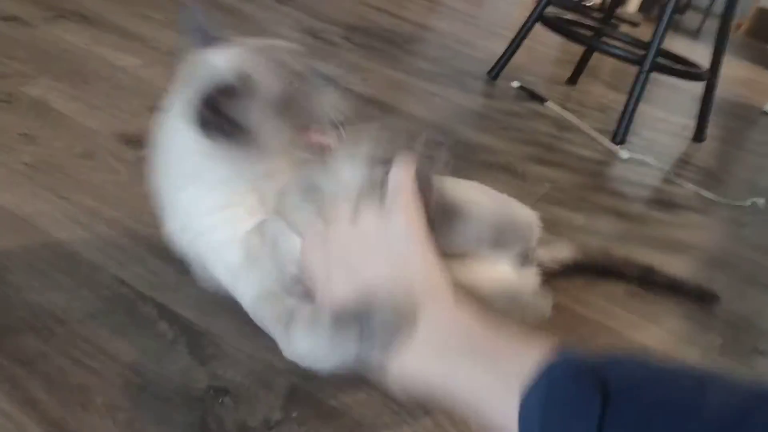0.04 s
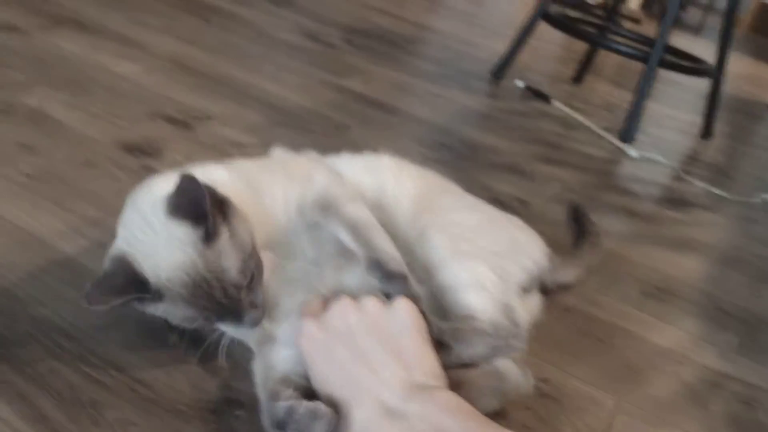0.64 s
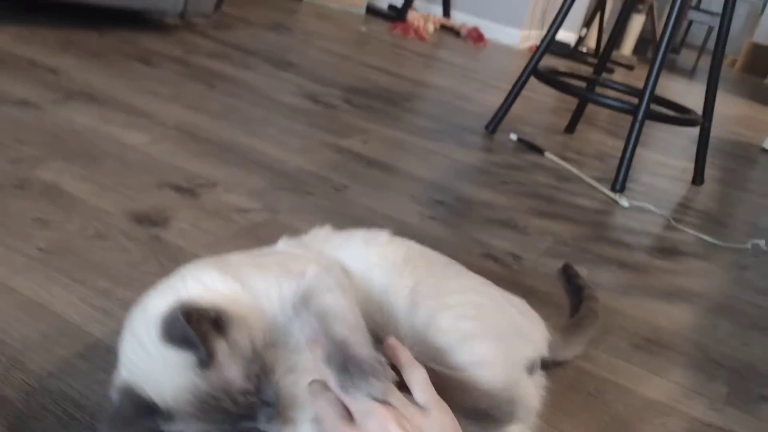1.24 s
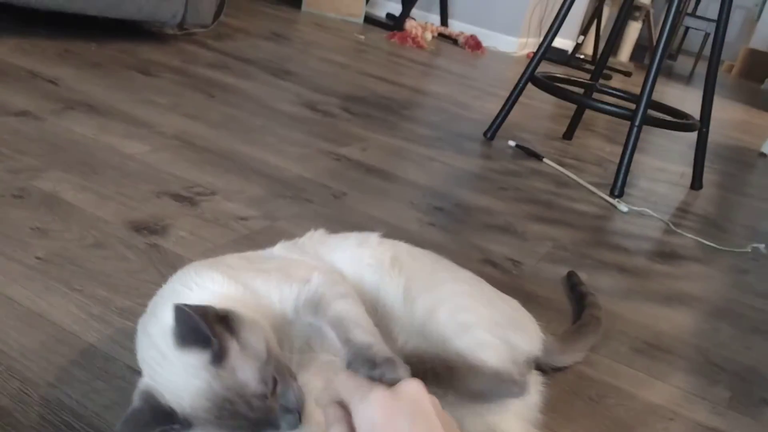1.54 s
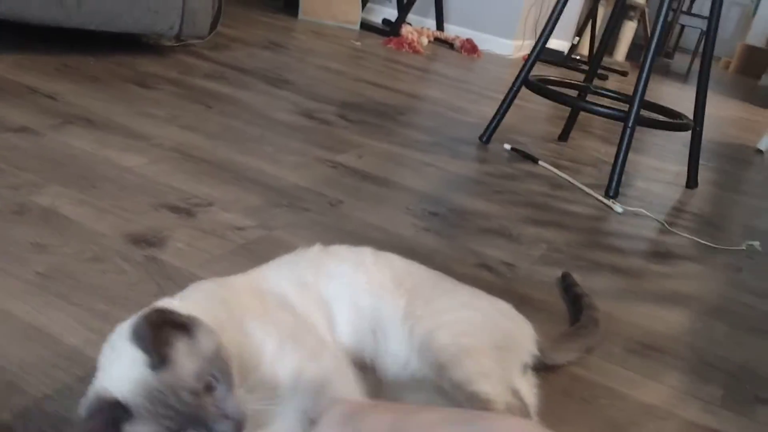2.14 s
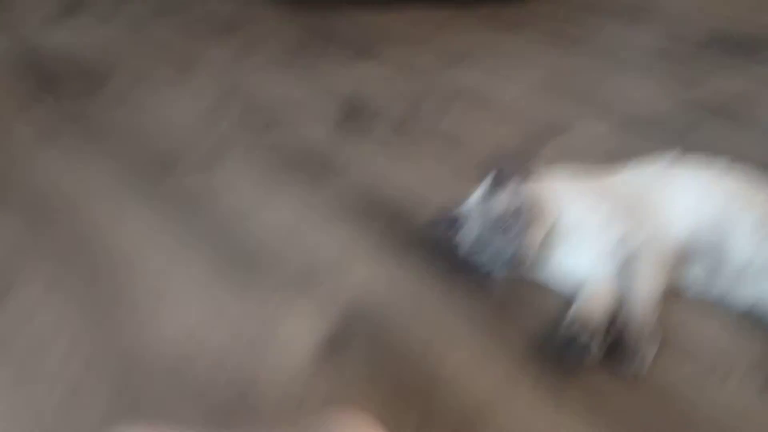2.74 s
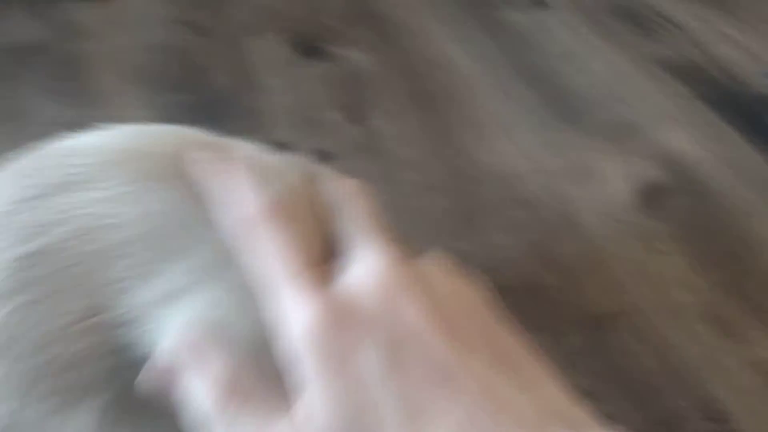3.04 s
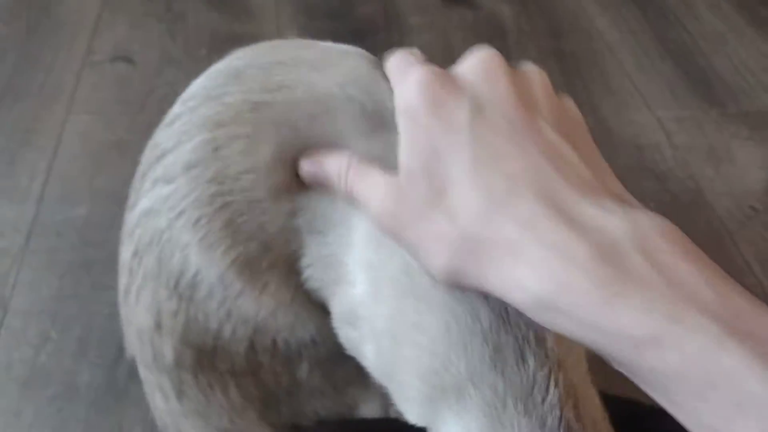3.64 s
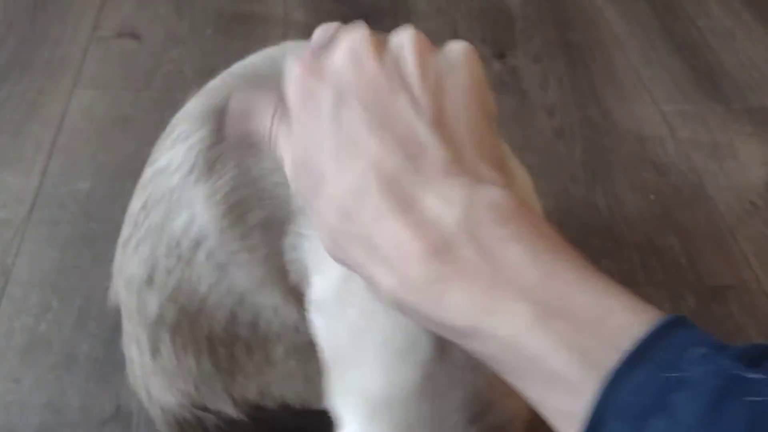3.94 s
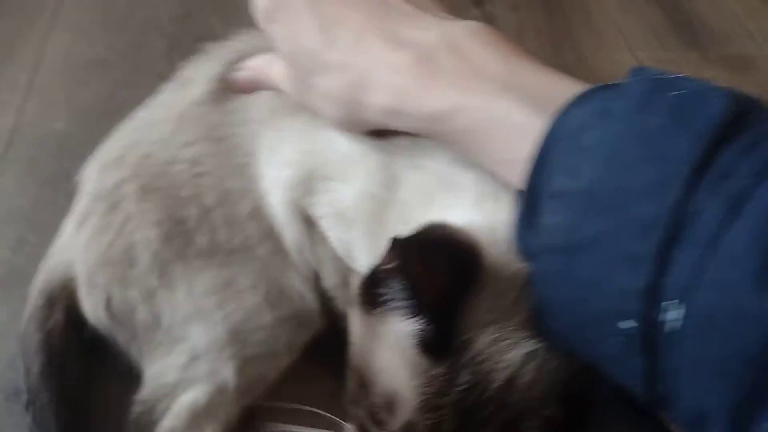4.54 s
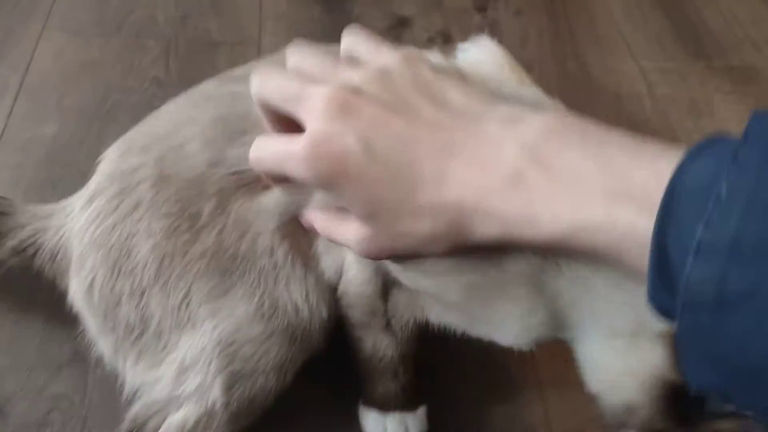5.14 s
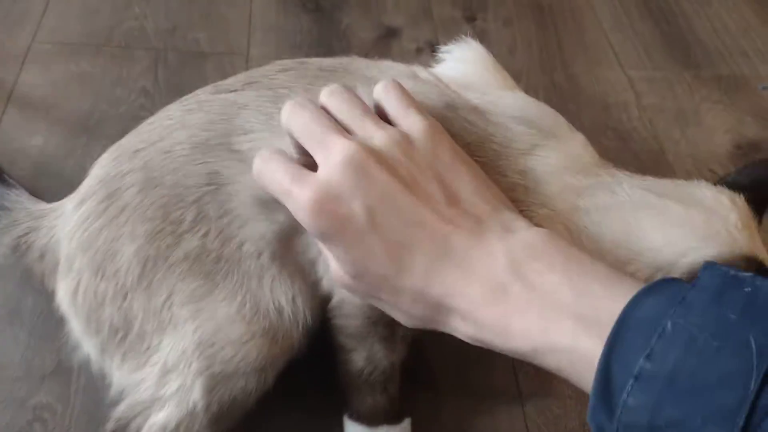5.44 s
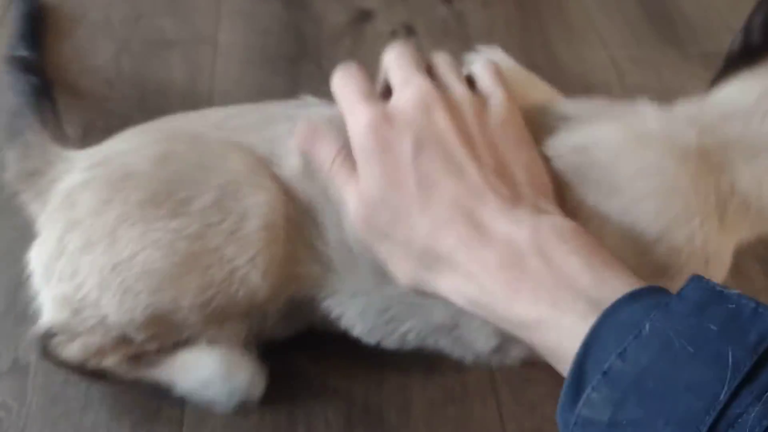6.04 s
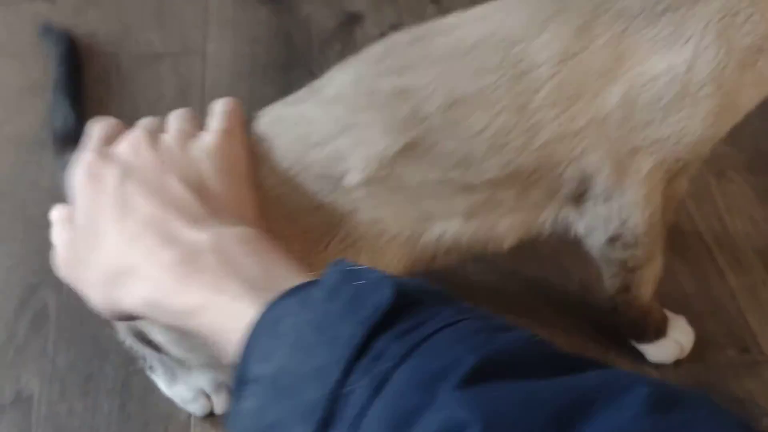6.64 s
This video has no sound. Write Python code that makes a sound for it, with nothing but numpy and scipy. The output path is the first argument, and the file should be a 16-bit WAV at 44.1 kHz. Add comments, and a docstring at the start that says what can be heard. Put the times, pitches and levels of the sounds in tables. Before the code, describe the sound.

A hand rubs a cat's fur close to the microphone in a quiet room. For the first second there is only faint brushing and a few light taps. From about 1.2 seconds the strokes grow into short, scratchy swishes, unevenly spaced and sometimes slightly hollow, each dying away quickly. A small, distinct knock of paw or hand comes at about 2 seconds. From 2.7 to 4.7 seconds the rubbing is briskest, and a jacket sleeve adds sharp snaps and short rasping scuffs, loudest around 3.6 seconds. After a brief lull, one more strong stroke with cloth snaps comes at 5.2 seconds. It then goes quiet, with softer strokes around 6 seconds, a faint slow rub, and a couple of soft bumps near 6.7 seconds. A faint low handling rumble and an appliance hum run underneath throughout.

```python
"""Brisk rub through a cat's fur

A hand rubs a cat on a wooden floor, the jacket sleeve close by. Countless hairs and threads slip,
so each stroke is a scratchy swish that dies away, with a hollow tone from the air under the palm.
The cloth catches and lets go in sharp snaps and short scuffs. Paws and hand bump softly,
over a low handling rumble and the hum of an appliance in the quiet room."""
import sys
import numpy as np
from scipy import signal
from scipy.fft import irfft
from scipy.io import wavfile

SR = 44100
rng = np.random.default_rng(int(sys.argv[2]) if len(sys.argv) > 2 else 0)


def dump(signal):
    """Clip the signal to [-1, 1] and save it as 16-bit WAV at the path in sys.argv[1]."""
    limited = np.clip(np.atleast_2d(signal).T, -1, 1)
    pcm = np.round(limited * 32767).astype(np.int16)
    wavfile.write(sys.argv[1], SR, pcm)


N = 304290
TIME = np.arange(N) / SR
CUTOFF_HZ = 8350
# a stroke sags while the hand travels, then dies away; the ruffled hairs keep settling quietly
SAG_DB_PER_S, TREBLE_RELEASE_DB_PER_S, BODY_RELEASE_DB_PER_S = 38, 146, 136
SETTLE_DB, SETTLE_DB_PER_S = -22.5, 35.5

# strokes of the hand, with body, hiss and hollow levels relative to the scratch:
# start_s, attack_s, hold_s, scratch_db, body_db, hiss_db, hollow_hz, hollow_db
HAND_STROKES = [ (0.107, 0.026, 0.095, -79, 9.5, 3, 1300, -6),
                (0.797, 0.022, 0.077, -71, -1.5, -5.5, 1310, -12),
                (0.886, 0.014, 0.12, -63.5, -3, -7, 1090, -14),
                (1.247, 0.0099, 0.053, -47.5, -8, -10, 1580, -4.5),
                (1.378, 0.065, 0.043, -43, -10.5, -6.5, 976, -12.5),
                (1.703, 0.0032, 0.084, -37, -8, -4, 917, -17),
                (1.925, .02, 0.066, -40.5, -5, -8.5, 850, -12),
                (2.244, .004, 0.04, -46, -5.5, -1.5, 815, -16),
                (2.436, 0.078, 0.08, -37.5, -7, -5, 1230, -11),
                (2.672, 0.0086, 0.056, -47.5, -3, -4, 715, -22.5),
                (2.73, 0.0049, 0.052, -36, -23, 2.5, 644, -5),
                (2.829, 0.038, 0.095, -43.5, -3, -2.5, 608, -17),
                (3.173, 0.0089, 0.083, -36, -10.5, 1, 726, -9.5),
                (3.323, 0.0087, .085, -35, -6.5, -0.5, 1135, -11.5),
                (3.558, 0.006, 0.051, -31, -10.5, 0.5, 760, -16),
                (3.677, 0.0084, 0.039, -34, -7.5, -2, 1280, -13.5),
                (3.961, 0.0064, 0.088, -36.5, -4.5, 1, 840, -22),
                (4.116, 0.045, 0.021, -43, -16, -0.5, 1400, -18),
                (4.264, 0.079, 0.048, -41.5, -3.5, -8, 1280, -19),
                (4.519, 0.018, 0.033, -40, -10, -8.5, 1004, -18.5),
                (4.624, 0.0068, 0.056, -37.5, -3, -6, 996, -2),
                (4.871, 0.0067, 0.032, -54, -5, -5, 1120, -8),
                (4.977, 0.045, .02, -53.5, -5.5, -14, 1400, -22),
                (5.221, 0.01, 0.092, -35, -5, -1, 1147, -5.5),
                (5.976, 0.014, .01, -60.5, 1.5, -13, 1250, 0.5),
                (6.049, 0.051, 0.036, -52.5, -10, -9.5, 1250, -28),
                (6.287, 0.22, 0.17, -65, -4, -12, 1100, -11)]
# muffled rub of the palm pressing into the coat: time_s, level_db
PALM_PRESS = [(0.0, -79.5), (0.6, -83), (1.2, -76.5), (1.7, -66), (2.2, -66.5), (2.75, -55.5),
              (3.04, -57.5), (3.16, -61), (3.42, -55), (4.05, -59.5), (4.24, -69.5), (4.62, -55.5),
              (4.85, -69.5), (5.25, -70), (5.5, -74), (6.25, -75.5), (6.5, -67.5), (6.9, -79.5)]
# modes of the air pocket under the palm: pitch_ratio, level_db
PALM_MODES = [(1, -0.5), (1.93, -7.5), (2.7, -3)]
# cloth snapping free: start_s, level_db, ring_hz
CLOTH_SNAPS = [(2.2469, -26, 3770), (2.4734, -26.5, 3970), (2.668, -28.5, 4330), (2.7303, -15, 3650),
               (2.7356, -13.5, 3900), (3.1759, -13, 3470), (3.469, -28.5, 3800), (3.519, -22.5, 4310),
               (3.5627, -8, 4660), (3.5676, -10, 4200), (3.68, -22.5, 3880), (3.9647, -13.5, 4900),
               (3.9845, -17.5, 4900), (4.2645, -29, 3680), (4.2724, -20.5, 3780), (4.5246, -30.5, 3410),
               (4.5403, -37, 3500), (4.6246, -19, 3530), (4.6448, -12.5, 3800), (4.6627, -17, 3830),
               (4.8825, -34, 3360), (5.2216, -19.5, 4830), (5.2347, -10, 4390), (6.0553, -35, 3800)]
# folds of cloth dragging: middle_s, level_db, half_length_s
CLOTH_SCUFFS = [(1.242, -58, .0018), (1.704, -38, 0.00083), (1.942, -38, 0.0021), (2.74, -24, 0.0013),
                (2.762, -38, 0.0035), (2.909, -33.5, .0048), (3.191, -25.5, 0.0023), (3.337, -23.5, 0.0035),
                (3.342, -18, 0.0033), (3.574, -20, .0015), (3.594, -30.5, .0007), (3.713, -20.5, 0.0055),
                (4.012, -27.5, .0043), (4.312, -27.5, 0.0079), (4.345, -24.5, 0.0037),
                (4.634, -31.5, 0.0032), (4.651, -22, 0.00097), (4.684, -41, .0025), (5.025, -42, 0.0046),
                (5.046, -39, 0.0035), (5.225, -28, 0.0015), (5.241, -21.5, 0.0024), (6.003, -48, 0.0051),
                (6.086, -40, 0.0043)]
# taps and bumps of paws and hand: start_s, peak_db, low_hz, high_hz, decay_s
SOFT_BUMPS = [(0.113, -54.5, 150, 980, 0.0088), (0.259, -52, 794, 2130, .003),
              (0.558, -57, 400, 1930, 0.0014), (0.676, -45, 225, 740, 0.0036),
              (0.789, -54.5, 1200, 4200, 0.0016), (1.44, -44.5, 130, 1000, .008),
              (1.9, -36.5, 820, 1250, 0.014), (2.03, -23, 706, 1240, 0.0027),
              (2.09, -39, 700, 1390, 0.0015), (2.295, -42, 686, 1000, 0.0023),
              (2.575, -34, 280, 700, 0.0024), (2.648, -39, 200, 1000, 0.0098),
              (3.028, -33.5, 1500, 3530, 0.0049), (3.717, -37.5, 220, 707, 0.0058),
              (4.049, -42.5, 250, 605, 0.0077), (5.90, -48.5, 700, 1386, 0.0021),
              (6.34, -49, 498, 1175, 0.0037), (6.637, -47, 151, 600, .002),
              (6.661, -37.5, 300, 1410, 0.002), (6.661, -40, 110, 398, 0.0018)]
# partials of the appliance hum: pitch_hz, relative_db
HUM_PARTIALS = [(64.6, -11), (129.2, -1)]
# swell and ebb of the hum: time_s, level_db
HUM_FADER = [(0, -72), (.6, -79.5), (1.5, -66), (2.3, -73.5), (2.9, -63), (3.15, -66), (4.55, -62.5),
             (5.0, -68.5), (5.3, -63.5), (5.7, -65), (5.87, -74.5), (6.2, -59.5), (6.9, -79)]

# tone colour of each layer: frequency_hz, gain_db
SCRATCH_EQ = [(1500, -36.5), (2300, -9.5), (2900, -3), (3500, 2.5), (4200, 2), (4800, -0.5), (5600, -14),
              (7500, -29)]  # bright scratch of the fur
HISS_EQ = [(3200, -20), (4400, -2.5), (5400, 7.5), (6400, 5), (7500, 3), (8300, -22), (9000, -22)]  # sheen of the finest hairs
BODY_EQ = [(450, -31.5), (700, -8.5), (950, -2.5), (1250, 0.5), (1650, -2), (2250, -1.5), (2600, -4.5),
           (3200, -4), (5000, -37)]  # midrange of the swish
RUB_EQ = [(120, -27.5), (230, -10.5), (340, -1), (450, -0.5), (600, -3), (800, -8.5), (1500, -38)]  # muffled rub of the palm
SNAP_EQ = [(200, -39), (500, -32), (800, -15.5), (1250, -10.5), (1900, -8), (2700, -5), (3600, -2),
           (4500, 1.5), (5500, -6), (7000, -9), (8500, -32.5)]  # crack of taut cloth
SCUFF_EQ = [(300, -29.5), (700, -27), (1200, -9), (1800, -12.5), (2400, -5.5), (3100, -3), (3900, 2.5),
            (4600, -2.5), (5500, -5), (7000, -19), (8500, -47.5)]  # rasp of a dragging fold
RUMBLE_EQ = [(20, -25.5), (45, -13.5), (65, -8.5), (82, -6), (98, 4.5), (115, -2.5), (140, -3.5), (190, -4),
             (270, -11.5), (500, -38.5)]  # low end of the handling


def fur_swish():
    """Countless hairs and threads slip; the grip flutters, moving all their colours together."""
    press_db = automation(PALM_PRESS)
    scratch_gain, body_gain, hiss_gain = stroke_gains(press_db)
    grip_db = 0.37 * drift(per_s=96)
    scratch = scratch_gain * unit_rms(eq(slips(per_s=14000, spread_db=3.5), SCRATCH_EQ))
    hiss = hiss_gain * unit_rms(eq(slips(per_s=21000, spread_db=1.0), HISS_EQ))
    body = body_gain * unit_rms(eq(slips(per_s=5200, spread_db=3.5), BODY_EQ))
    rub = from_db(press_db) * unit_rms(eq(slips(per_s=1200, spread_db=3.0), RUB_EQ))
    rustle = from_db(grip_db) * (scratch + hiss + body + rub)
    rustle = near_echo(rustle, delay_s=0.0013, share=0.19)
    return near_echo(rustle, delay_s=0.0034, share=0.25)


def stroke_gains(press_db, rest_db=(-3, 1.5, -4)):
    """Gains of scratch, body and hiss: the strokes add their power to the resting hand's rustle."""
    scratch, body, hiss = (from_db(press_db + db) ** 2 for db in rest_db)
    for start_s, attack_s, hold_s, scratch_db, body_db, hiss_db, _, _ in HAND_STROKES:
        treble_shape = stroke_envelope(attack_s, hold_s, TREBLE_RELEASE_DB_PER_S)
        body_shape = stroke_envelope(attack_s, hold_s, BODY_RELEASE_DB_PER_S)
        mix_in(scratch, start_s, (from_db(scratch_db) * treble_shape) ** 2)
        mix_in(hiss, start_s, (from_db(scratch_db + hiss_db) * treble_shape) ** 2)
        mix_in(body, start_s, (from_db(scratch_db + body_db) * body_shape) ** 2)
    return np.sqrt([scratch, body, hiss])


def stroke_envelope(attack_s, hold_s, release_db_per_s):
    """One second of gain: the stroke rises, sags and dies away while the hairs settle."""
    age = TIME[:SR]
    sag_db = SAG_DB_PER_S * np.clip(age - attack_s, 0, hold_s)
    release_db = release_db_per_s * np.maximum(age - attack_s - hold_s, 0)
    settling_db = SETTLE_DB - SETTLE_DB_PER_S * age
    return np.minimum(age / attack_s, 1) * from_db(np.maximum(-sag_db - release_db, settling_db))


def cupped_palm(width_hz=230):
    """Friction sounds the air pocket under the palm, whose size differs from stroke to stroke."""
    out = np.zeros(N)
    friction = slips(per_s=7400, spread_db=3.0)
    for start_s, attack_s, hold_s, scratch_db, _, _, hollow_hz, hollow_db in HAND_STROKES:
        drive = np.roll(friction, -int(start_s * SR))[:SR]
        hollow = np.zeros(SR)
        for ratio, mode_db in PALM_MODES:
            hz = ratio * hollow_hz
            hollow += from_db(mode_db) * resonate(resonate(drive, hz, width_hz), hz, width_hz)
        shape = stroke_envelope(attack_s, hold_s, BODY_RELEASE_DB_PER_S)
        mix_in(out, start_s, from_db(scratch_db + hollow_db) * unit_rms(hollow) * shape)
    return out


def cloth_snaps(sweep_s=0.0018, rebound_db=-2.0, shiver_db=-19.5, shiver_s=0.002):
    """Taut cloth lets go, rebounds about a millisecond later and shivers; its treble travels fastest."""
    clicks, age = np.zeros(N), TIME[:900]
    for start_s, level_db, ring_hz in CLOTH_SNAPS:
        snap = from_db(shiver_db) * rng.standard_normal(len(age)) * np.exp(-age / shiver_s)
        snap[0] = 1  # the cloth lets go
        rebound_s = rng.uniform(0.0007, 0.0014)
        snap[int(rebound_s * SR)] += from_db(rebound_db) * rng.choice([-1, 1])
        # every fold has its own size, and so its own brief ring
        ring = 0.96 * resonate(snap, ring_hz, width_hz=600)
        mix_in(clicks, start_s + sweep_s / 2, from_db(level_db) * (snap + ring))
    return eq(clicks, SNAP_EQ, sweep_s)


def cloth_scuffs():
    """A fold drags for a few milliseconds: a swelling train of slips in the same cloth."""
    drag = np.zeros(N)
    for middle_s, level_db, half_length_s in CLOTH_SCUFFS:
        offset = (TIME - middle_s) / half_length_s
        drag += from_db(level_db) * np.exp(-0.5 * np.minimum(offset ** 2, 100))
    return drag * unit_rms(eq(slips(per_s=6000, spread_db=0), SCUFF_EQ, sweep_s=0.0019))


def soft_bumps():
    """Paws and hand land with a short push, duller the softer the pad."""
    out, age = np.zeros(N), TIME[:3000]
    for start_s, peak_db, low_hz, high_hz, decay_s in SOFT_BUMPS:
        push = rng.standard_normal(len(age)) * np.exp(-age / decay_s)
        pad = signal.butter(2, [low_hz, high_hz], "band", fs=SR, output="sos")
        thud = signal.sosfilt(pad, push)
        mix_in(out, start_s, from_db(peak_db) * thud / np.abs(thud).max())
    return out


def handling_rumble(base_db=-66.5, base_press_db=-70, follow=0.42):
    """Low rumble that grows as the palm presses harder."""
    level_db = base_db + follow * (automation(PALM_PRESS) - base_press_db)
    return from_db(level_db) * unit_rms(eq(rng.standard_normal(N), RUMBLE_EQ))


def appliance_hum(waver_rad=0.39):
    """An appliance drones on two low partials, each wavering in phase."""
    hum = np.zeros(N)
    for hz, db in HUM_PARTIALS:
        phase = 2 * np.pi * hz * TIME + waver_rad * drift(per_s=1.2)
        hum += from_db(db) * np.sqrt(2) * np.sin(phase)
    return from_db(automation(HUM_FADER)) * hum


def near_echo(x, delay_s, share):
    """A reflection from a surface close by; its path wanders as the arm moves, so the colour shifts."""
    lag_s = delay_s * np.exp(0.094 * drift(per_s=3.4))
    echo = np.interp(TIME - lag_s, TIME, x)
    return (x + share * echo) / np.sqrt(1 + share ** 2)


def room(x, t60_s, wet_db, build_s=0.0084):
    """Diffuse reflections from floor and furniture, building up over the first milliseconds."""
    age = TIME[:SR // 2]
    tail = rng.standard_normal(len(age)) * from_db(-60 * age / t60_s) * (1 - np.exp(-age / build_s))
    return x + from_db(wet_db) * signal.oaconvolve(x, tail / np.linalg.norm(tail))[:N]


def slips(per_s, spread_db):
    """The grain of friction: tiny stick-slip clicks at random moments, rms 1."""
    sizes = from_db(spread_db * np.minimum(rng.exponential(1, N), 4)) * rng.choice([-1, 1], N)
    return unit_rms(sizes * (rng.random(N) < per_s / SR))


def eq(x, curve, sweep_s=0, size=4096):
    """Colour a sound with a pulse of peak 1; treble at the cutoff arrives sweep_s early."""
    hz = np.maximum(np.fft.rfftfreq(size, 1 / SR), 1)
    curve_hz, curve_db = np.transpose(curve)
    gain = from_db(np.interp(np.log(hz), np.log(curve_hz), curve_db, left=-80, right=-80))
    lead_s = sweep_s * np.minimum(hz / CUTOFF_HZ, 2) ** 2
    phase = 2 * np.pi * np.cumsum(lead_s) * SR / size
    pulse = np.roll(irfft(gain * np.exp(1j * phase)), size // 2)
    return signal.oaconvolve(x, pulse / np.abs(pulse).max(), "same")


def resonate(x, hz, width_hz):
    """One resonance, gain 1 at its peak."""
    radius = np.exp(-np.pi * width_hz / SR)
    feedback = [1, -2 * radius * np.cos(2 * np.pi * hz / SR), radius ** 2]
    return signal.lfilter(np.array([1, 0, -1]) * (1 - radius ** 2) / 2, feedback, x)


def drift(per_s):
    """A wander through per_s random points a second, rms 1."""
    knots = rng.standard_normal(int(N / SR * per_s) + 2)
    return unit_rms(np.interp(TIME * per_s, np.arange(len(knots)), knots))


def automation(points):
    """A fader move, read at every sample."""
    return np.interp(TIME, *np.transpose(points))


def mix_in(out, start_s, x):
    """Mix x into out from a start time on."""
    part = out[int(start_s * SR):][:len(x)]
    part += x[:len(part)]


def from_db(db):
    """Decibels to gain."""
    return 10 ** (np.asarray(db) / 20)


def unit_rms(x):
    """Scale to rms 1."""
    return x / np.sqrt(np.mean(x ** 2) + 1e-20)


def scene():
    """Mono mix: the rub up close, cloth and bumps with a little room, rumble and hum underneath."""
    cloth = cloth_snaps() + near_echo(cloth_scuffs(), delay_s=0.001089, share=0.29)
    cloth = room(cloth, t60_s=0.46, wet_db=-7.5)
    bumps = room(soft_bumps(), t60_s=0.25, wet_db=-10.5)
    return (fur_swish() + cupped_palm() + cloth + bumps + handling_rumble() + appliance_hum())[None]


def record(dry):
    """A steep low-pass takes the air off the top."""
    low_pass = signal.firwin(161, CUTOFF_HZ, window=("kaiser", 7), fs=SR)
    return signal.fftconvolve(dry, low_pass[None], "same")


dry = scene()
out = record(dry)
dump(out)
```